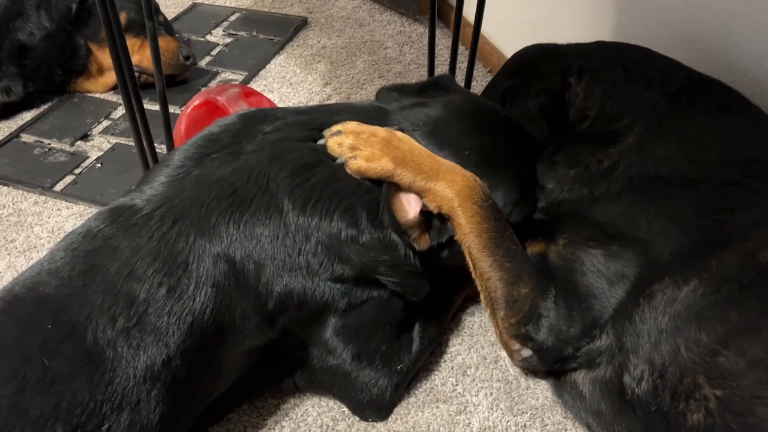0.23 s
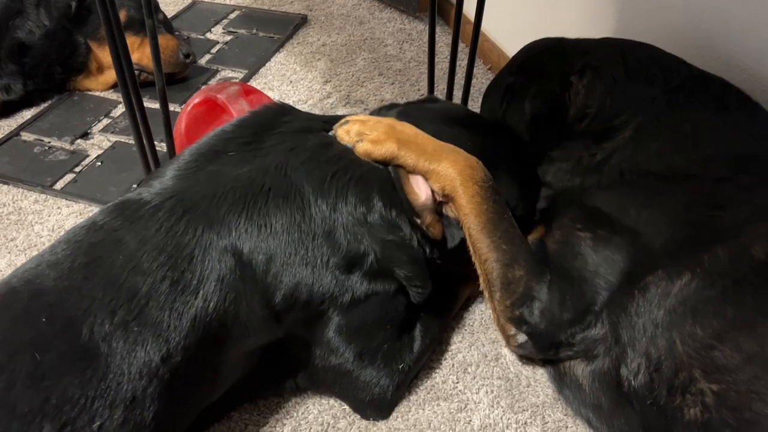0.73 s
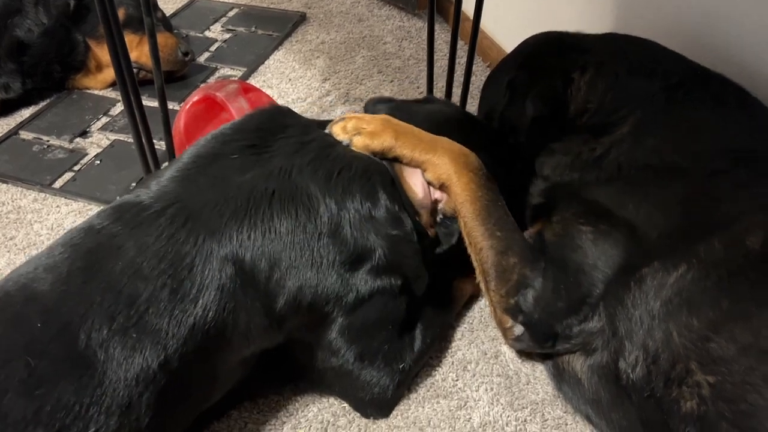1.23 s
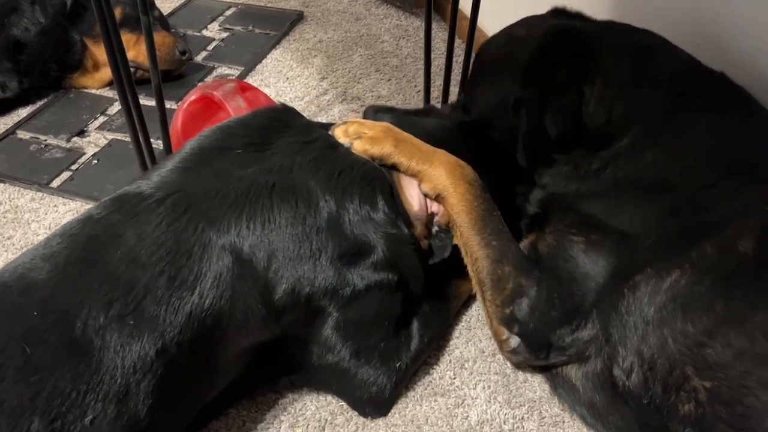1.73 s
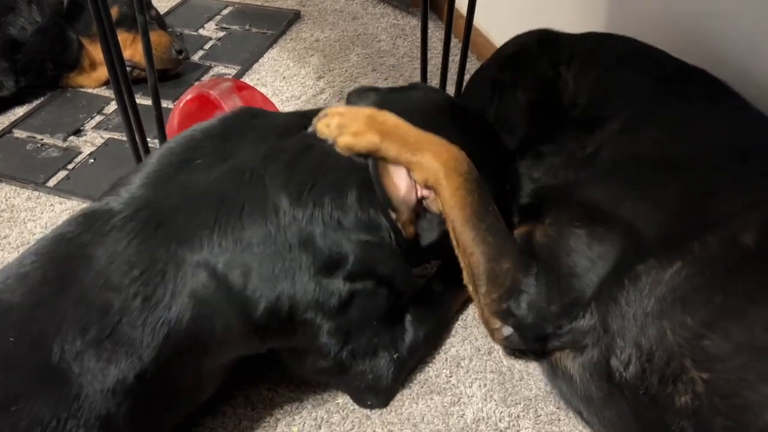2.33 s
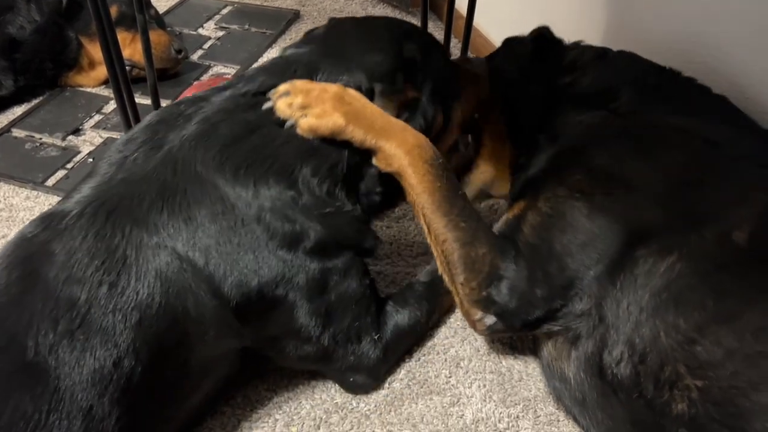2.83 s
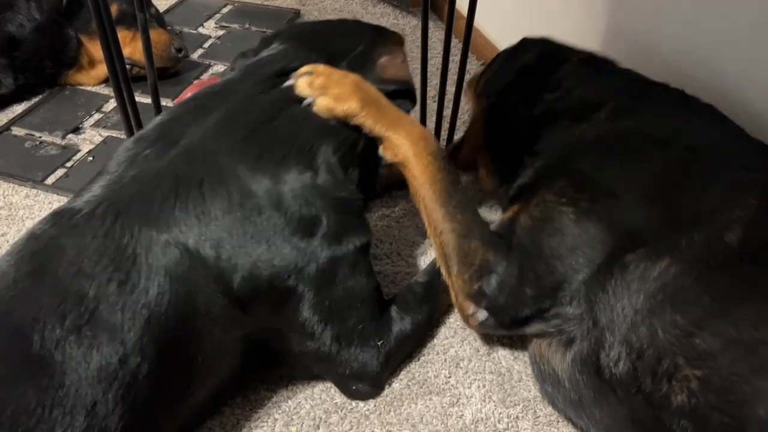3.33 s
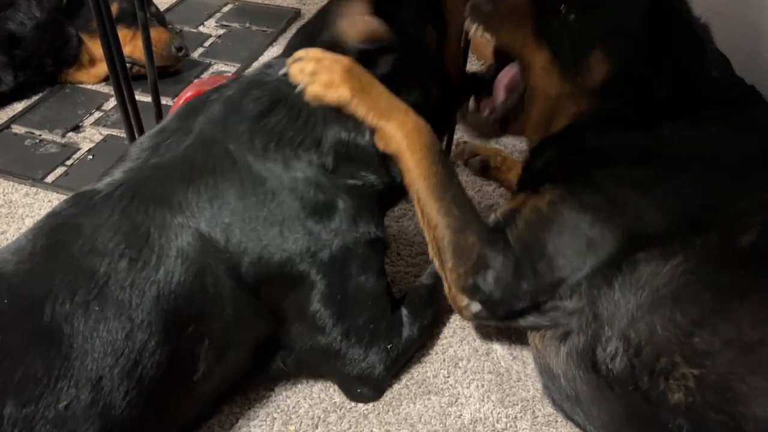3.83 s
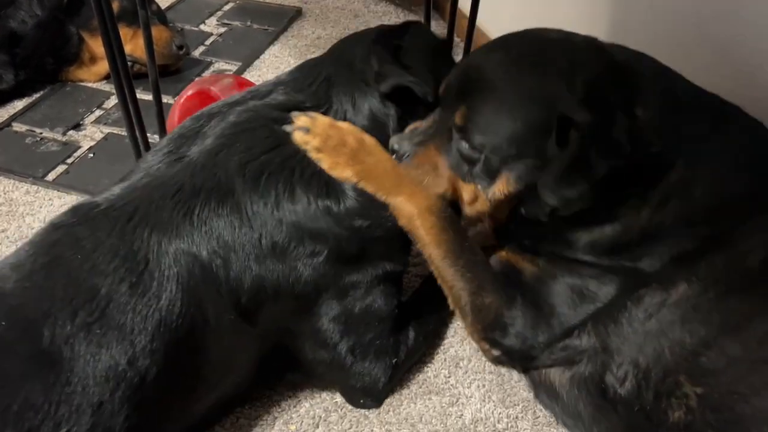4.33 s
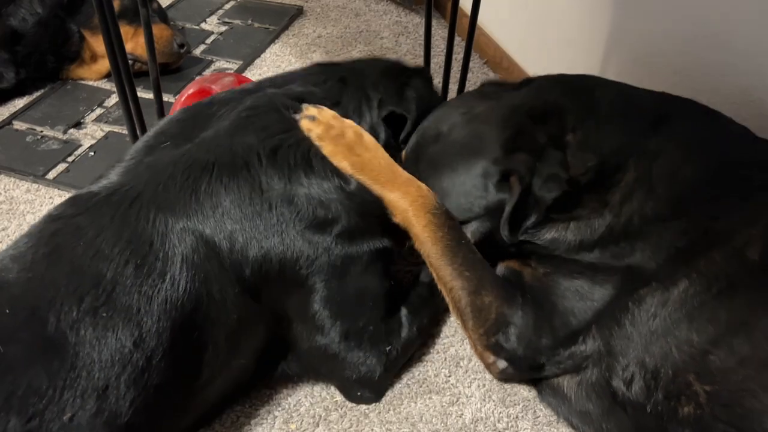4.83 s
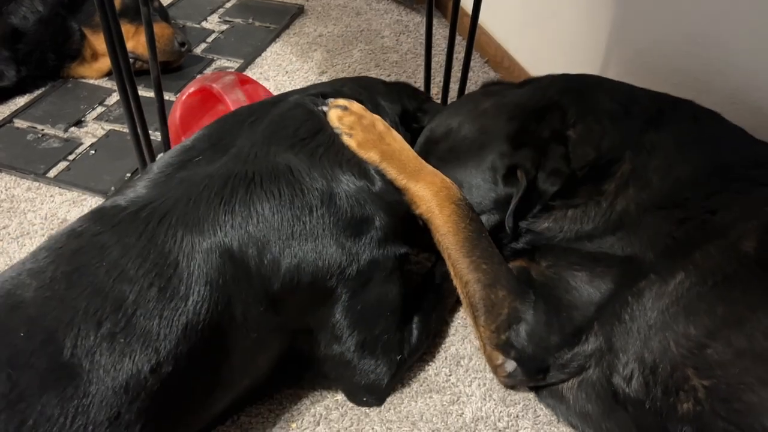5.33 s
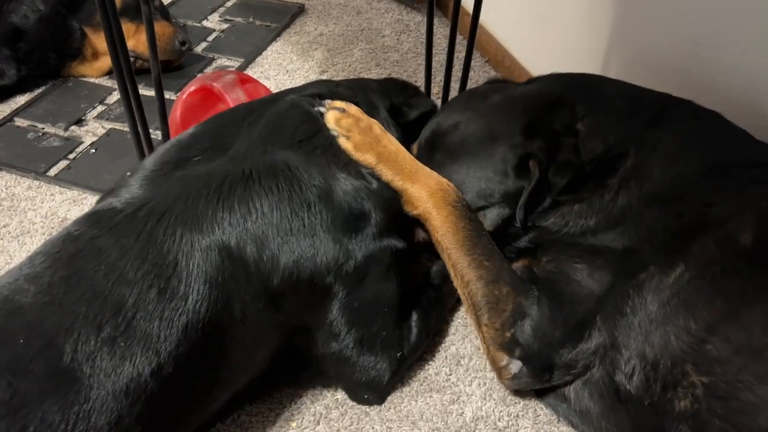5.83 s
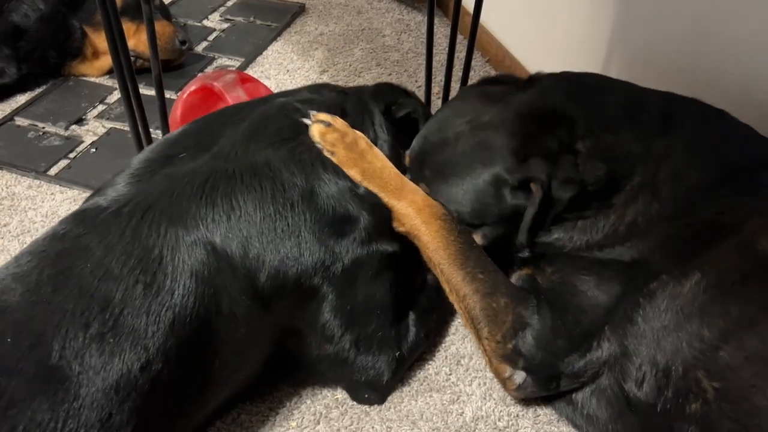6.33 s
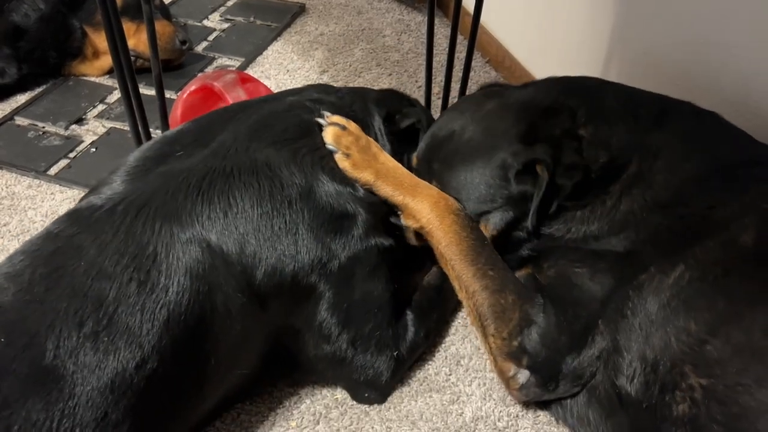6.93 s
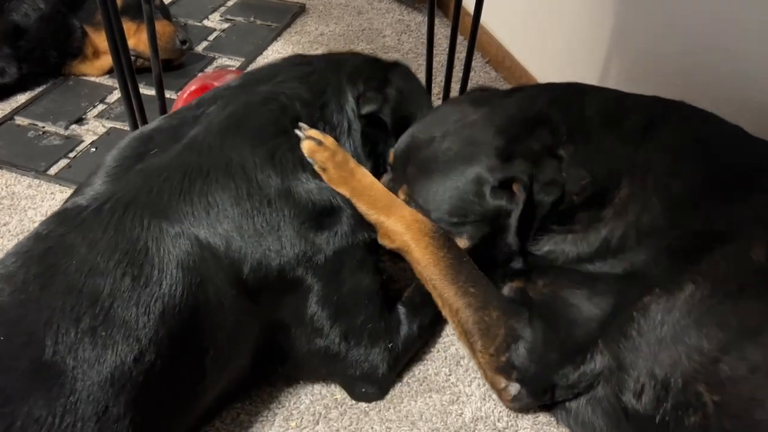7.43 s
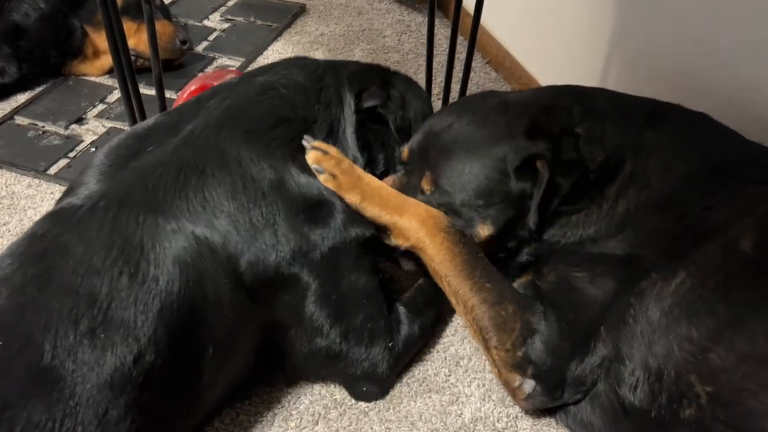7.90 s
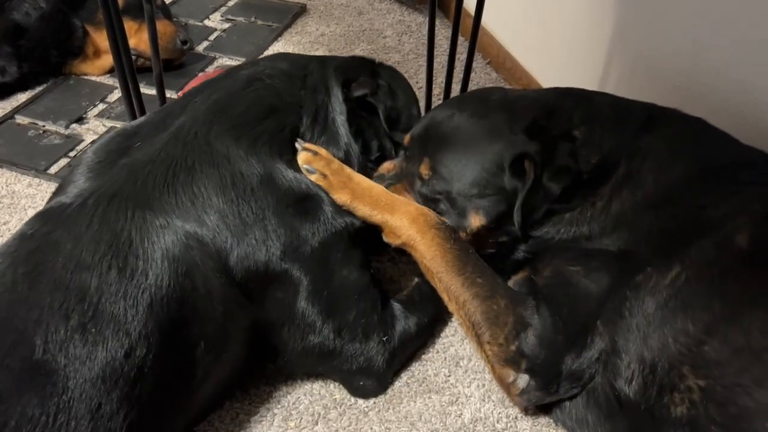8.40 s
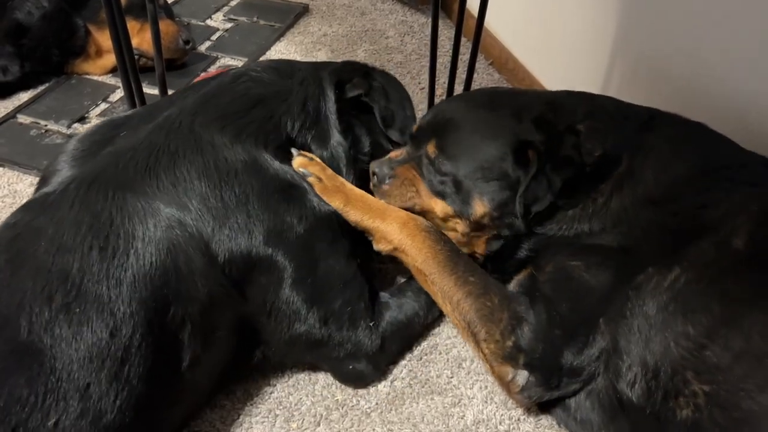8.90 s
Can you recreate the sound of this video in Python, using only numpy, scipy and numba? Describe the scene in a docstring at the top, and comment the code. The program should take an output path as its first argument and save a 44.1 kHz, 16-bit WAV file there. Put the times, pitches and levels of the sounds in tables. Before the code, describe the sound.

Two large dogs play-fight indoors, close to a phone. Deep fluttering growls start after about a second and repeat roughly once a second, shifting from open, gaping snarls to tighter, raspier ones. Breath hisses and snuffles between them, teeth click, something knocks dully, and a tiny whimper precedes the last growl. Short room echoes over faint low hum.

```python
"""A large dog growls in seven long, rough bursts, with short grunts between, as two wrestle close to a phone.
Slack vocal folds slap about 70 times a second and ring chest and throat; a moving mouth shapes the snarl.
Noise pulsed by the slaps makes the rushing air. Lips flap, teeth click, a dog whimpers and snuffles,
and something knocks softly. A small room answers with decaying noise echoes over its low, noisy hum."""
import sys
import numpy as np
from scipy import signal
from scipy.fft import rfft, irfft
from scipy.io import wavfile
from scipy.ndimage import uniform_filter1d
from numba import njit

SR = 44100
rng = np.random.default_rng(int(sys.argv[2]) if len(sys.argv) > 2 else 0)


def to_wav(sig):
    """Store sig (one row per channel, or 1-D mono) as 16-bit WAV at the path in sys.argv[1].

    Samples outside -1..1 are clipped; the rate is SR.
    """
    pcm = np.clip(np.atleast_2d(sig), -1, 1) * 32767
    pcm = np.round(pcm).astype(np.int16)
    wavfile.write(sys.argv[1], SR, pcm.T)  # frames by channels


N = 403956
TIME = np.arange(N) / SR

# Growls and the soft grunts between them; effort and swelling change these base levels:
# start_s, end_s, pulse_rate_hz, final_rate_sag_hz, first_roughness (0-1), last_roughness (0-1),
# chest_db, throat_db, snarl_db, air_db, snarl_fading_db_per_s
GROWLS = [(1.34, 1.79, 73.12, 7, 0.26, 0.47, -24.5, -38.5, -42, -62.5, 2.5),
          (2.135, 3.19, 72.45, 5.5, 0.63, 0.43, -21.5, -39.5, -40, -58.5, 2),
          (3.37, 3.41, 68.44, 0, 0.53, 0.91, -39, -54, -50.5, -57.5, 18),
          (3.575, 3.865, 70.9, 5, 0.49, 0.35, -21, -41, -33.5, -46.5, -15.5),
          (4.13, 4.21, 69.93, 0, 0.75, 0.57, -36.5, -50, -43.5, -56.5, 24),
          (4.265, 5.26, 68.3, 5, 0.88, 0.5, -23, -39, -34, -54.5, 12.5),
          (5.6, 5.7, 65.9, 0, 0.57, 0.75, -41, -51, -60.5, -69, -5),
          (5.735, 6.64, 70.78, 12, 0.78, 0.63, -22.5, -36, -38, -57, 4),
          (7.12, 8.04, 72.94, 23, 0.73, 0.084, -20.5, -33, -36.5, -59.5, 1),
          (8.58, 9.2, 69.18, 3.5, 0.72, 0.68, -23.5, -33.5, -38.5, -52, 0.5)]
# The voice breaks into a higher, cleaner register:
# start_s, end_s, first_hz, last_hz, chest_change_db, roughness (0-1)
BREAKS = [(2.675, 2.89, 113, 98.97, 0, .2), (4.33, 4.55, 130, 106, -2.5, .7)]
# Hard flaps of the lips: time_s, peak_db (before a common gain), mouth_resonance_hz
FLAPS = [(2.160, -28, 1507), (2.440, -29, 810), (2.668, -22, 756), (2.717, -23, 773), (2.867, -28.5, 770),
         (3.715, -18.5, 830), (3.729, -23, 877.7), (3.76, -21, 720), (3.807, -18, 786), (3.82, -16.5, 720),
         (4.272, -19.5, 770), (4.561, -14.5, 1060), (4.593, -17.5, 1153), (4.763, -31, 734),
         (4.991, -24, 740), (5.901, -28, 707.5), (6.02, -18.5, 1276), (6.036, -24, 1206),
         (6.091, -20, 1240), (6.107, -28, 1271), (6.256, -25.5, 1220), (6.443, -24, 707),
         (7.135, -27, 1280), (7.178, -24, 1210), (7.307, -22, 1190), (8.808, -31, 700), (8.9, -16, 1208),
         (8.915, -16.5, 1255), (8.957, -18, 1302), (8.973, -20.5, 1260), (9.071, -27, 1250),
         (9.115, -30, 1280)]
SAG_S = 0.3  # length of the tired end of a growl
ATTACK_DB_PER_S = 421.5


def undb(db):
    """Decibels to gain."""
    return 10 ** (np.asarray(db) / 20)


def unit(x):
    """Scale to rms 1."""
    return x / np.sqrt(np.mean(x ** 2))


def steady(x, seconds):
    """Even out the slow level, keeping the single pulses."""
    size = int(seconds * SR)
    power = uniform_filter1d(uniform_filter1d(x ** 2, size), size)
    return x / np.sqrt(power + 1e-5 * np.mean(x ** 2))


def colour(x, points):
    """Causal minimum-phase filter through (Hz, dB) points, made by folding the cepstrum."""
    size = 16384
    hz, db = np.transpose(points)
    f = np.maximum(np.fft.rfftfreq(size, 1 / SR), 1)
    cepstrum = irfft(np.log(undb(np.interp(np.log(f), np.log(hz), db))))
    cepstrum[1:size // 2] *= 2
    cepstrum[size // 2 + 1:] = 0
    response = irfft(np.exp(rfft(cepstrum)))[:size // 2]
    return signal.fftconvolve(x, response)[:N]


def cut(x, hz, kind, order=2):
    """Butterworth low- or high-pass."""
    return signal.sosfilt(signal.butter(order, hz, kind, fs=SR, output="sos"), x)


@njit
def resonate(x, hz, width):
    """Band-pass of a given width in Hz whose centre may move: a state-variable filter."""
    y, band, low = np.empty(len(x)), 0., 0.
    for i in range(len(x)):
        g, damping = np.tan(np.pi * hz[i] / SR), width / hz[i]
        v = (band + g * (x[i] + 1e-18 - low)) / (1 + g * (g + damping))
        band, low, y[i] = 2 * v - band, low + 2 * g * v, damping * v
    return y


def cavity(x, modes):
    """Fixed resonances side by side, with alternating sign."""
    out = np.zeros(N)
    for k, (hz, width, db) in enumerate(modes):
        out += (-1) ** k * undb(db) * resonate(x, np.full(N, float(hz)), float(width))
    return out


def impulses(times, sizes):
    """One spike at each time."""
    return np.bincount(np.clip(times * SR, 0, N).astype(int), sizes, N + 1)[:N]


def fade(x, seconds):
    """Give each spike an exponential tail."""
    return signal.lfilter([1], [1, -np.exp(-1 / (seconds * SR))], x)


def walk(rate):
    """A smooth random wander with rms 1, slower than the given rate in Hz."""
    return unit(cut(rng.standard_normal(N), rate, "low"))


def ramp(start, end):
    """0 before the start, 1 after the end, straight in between."""
    return np.clip((TIME - start) / max(end - start, .001), 0, 1)


def swells(rows):
    """Smooth bumps from (time_s, half_length_s, height) rows."""
    return sum(height * np.exp(-np.minimum(((TIME - s) / length) ** 2, 50)) for s, length, height in rows)


def growl(air_db=-2, throat_rasp=0.93, snarl_rasp=1.51, snarl_scatter_db=2.5, snarl_surge_db=3.0,
          air_surge_db=1.3, air_side=0.7, air_tick=0.066):
    """Fold slaps ring chest, throat and moving mouth; air rushes after them. Gives voice and side spray."""
    # chest body: frequency_hz, level_db
    chest_points = [(18, -69.5), (30, -37), (50, -2.5), (70, 10.5), (97, 0), (144, -2), (177, -8.5),
                    (283, -19.5), (300, -12.5), (390, -45), (660, -120)]
    steady_flow = .33  # air that escapes whatever the folds do
    full_voice_db = -27  # below this chest level the rattle dies with the voice
    chest_level, throat_level, snarl_level, air_level = levels()
    hz, rough = folds()
    times, sizes = fold_slaps(hz, rough)
    slaps = impulses(times, sizes)
    # in a rough voice some closures are much sharper than others, which shows in the upper resonances
    scatter = snarl_scatter_db * np.interp(times, TIME, rough) * rng.standard_normal(len(times))
    sharp = impulses(times, sizes * undb(scatter))
    flow = unit(unit(fade(sharp, 0.004)) + steady_flow)
    rasp, rush, spray = flow * rng.standard_normal((3, N))
    # smooth closures leak little turbulence into the voice
    rasp = rasp * np.sqrt(rough)
    chest = cut(cut(colour(slaps, chest_points), 233, "low", order=4), 40, "high")
    throat = throat_ring(unit(slaps) + throat_rasp * rasp)
    throat = cut(cut(throat, 205, "high", order=4), 750, "low", order=4)
    mouth = wall_echo(snarl(unit(sharp) + snarl_rasp * rasp))
    # the closures themselves also tick in the upper resonances
    rush = rush + air_tick * unit(cut(slaps, 4200, "low"))
    air = hiss(rush + 0.56 * rng.standard_normal(N))
    side = hiss(spray + 0.56 * rng.standard_normal(N))
    throat_level = throat_level + 1.97 * walk(13.8)
    snarl_level = snarl_level + seals() + snarl_surge_db * rough * walk(6.7)
    air_level = air_level + air_db + air_surge_db * walk(9.5)
    layers = [(chest, chest_level), (throat, throat_level), (mouth, snarl_level), (air, air_level)]
    voice = sum(steady(x, 0.09) * undb(db) for x, db in layers)
    voice += rattle(slaps, rasp) * undb(np.minimum(chest_level - full_voice_db, 0))
    return voice, air_side * steady(side, .06) * undb(air_level)


def levels():
    """Chest, throat, snarl and air in dB: attack, hold, sag and release, with pushes of effort on top."""
    # pushes of effort within a growl: time_s, half_length_s, snarl_change_db, air_change_db
    pushes = [(1.699, 0.034, -0.5, 4), (2.172, 0.023, 5.5, 10), (2.523, 0.063, 4, -5),
              (2.706, 0.22, 6.5, 8), (3.088, 0.012, 2.5, 10), (3.193, 0.12, 2.5, 11), (3.622, 0.016, 6, 8),
              (3.87, 0.0096, 5.5, 6.5), (4.27, 0.044, 6, 12.5), (4.518, 0.21, 5, 4.5),
              (5.017, 0.078, 0, -12), (4.805, 0.055, 5, 8), (5.773, 0.052, 2.5, 3.5),
              (6.104, 0.063, 5, 7.5), (7.185, 0.17, 1, 9), (7.958, 0.12, -3, 3), (8.93, 0.068, -1.5, 0)]
    # each layer starts this much weaker and swells: chest, throat, snarl, air [dB]
    swell_db = np.array([3.1, 8.7, 3.8, 6.7])[:, None]
    swell_s = 0.026
    # faint lingering around each growl, relative to it: chest, throat, snarl, air [dB]
    edge_db = np.array([-19.5, -22, -18, -11])[:, None]
    edge_db_per_s = 85
    # snarl and air stir later than the low rumble before a growl and rise faster
    lead = np.array([edge_db_per_s, edge_db_per_s, 188, 188])[:, None]  # dB per s
    release = np.array([318, 318, 392, 292])[:, None]  # dB per s
    sag_db_per_hz = 0.25  # as the air runs out the slowing folds weaken
    snarl_sag = 0.38  # share of this weakening that reaches the snarl
    air_fading = 0.93  # share of the snarl's fading that the air follows
    push_chest, push_throat = 0.18, 0.94  # dB for each dB of snarl
    out = np.full((4, N), -120.)
    for start, end, _, sag, _, _, chest, throat, mouth, air, fading in GROWLS:
        tired = sag_db_per_hz * sag * ramp(end - SAG_S, end)
        faded = fading * (end - start) * ramp(start, end)
        held = np.array([chest - tired, throat - tired,
                         mouth - snarl_sag * tired - faded, air - air_fading * faded])
        held = held - swell_db * np.exp(-np.maximum(TIME - start, 0) / swell_s)
        before, after = np.maximum(start - TIME, 0), np.maximum(TIME - end, 0)
        main = -ATTACK_DB_PER_S * before - release * after
        edge = edge_db - lead * before - edge_db_per_s * after
        out = np.maximum(out, held + np.maximum(main, edge))
    out[0] += sum(db * in_break(start, end) for start, end, _, _, db, _ in BREAKS)
    push = swells([(s, length, db) for s, length, db, _ in pushes])
    blow = swells([(s, length, db) for s, length, _, db in pushes])
    return out + np.array([push_chest * push, push_throat * push, push, blow])


def folds():
    """Pulse rate and roughness: each growl scoops up, settles, and sags at the end."""
    scoop_hz, scoop_s = 9, .13  # the folds start slow and gather speed
    waver, waver_hz = .058, 8  # relative spread of the rate at full roughness, and its speed
    hz, rough = np.full(N, float(GROWLS[0][2])), np.zeros(N)
    for start, end, rate, sag, first, last, *_ in GROWLS:
        now = TIME > start - 20 / ATTACK_DB_PER_S
        scoop = scoop_hz * np.exp(-np.maximum(TIME - start, 0) / scoop_s)
        hz = np.where(now, rate - scoop - sag * ramp(end - SAG_S, end), hz)
        rough = np.where(now, first + (last - first) * ramp(start, end - SAG_S), rough)
    for start, end, first, last, _, roughness in BREAKS:
        share = in_break(start, end)
        hz = hz + share * (first + (last - first) * ramp(start, end) - hz)
        rough = rough + share * (roughness - rough)
    rough = np.clip(rough, 0, 1)
    return hz * np.exp(waver * rough * walk(waver_hz)), rough


def in_break(start, end, glide_s=.07):
    """How far the voice is in its higher register, 0-1."""
    return ramp(start - glide_s, start) - ramp(end, end + glide_s)


def fold_slaps(hz, roughness, jitter=.2, shimmer_db=4, second_slap=0.92, second_at=.46,
               second_scatter=0.1822):
    """Times and sizes of the closures; rough folds stumble and slap again in mid-cycle."""
    cycles = np.cumsum(hz) / SR
    times = np.interp(np.arange(1, int(cycles[-1])), cycles, TIME)
    period = 1 / np.interp(times, TIME, hz)
    rough = np.interp(times, TIME, roughness)
    chance = rng.standard_normal((len(times), 5)).T
    # each stumble carries over into the next cycles
    stumble = signal.lfilter([1], [1, -.8], chance[0])
    first = times + jitter * rough * period * stumble
    second = first + period * (second_at + second_scatter * rough * chance[1])
    sizes = undb(shimmer_db * rough * chance[2:4])
    return np.r_[first, second], np.r_[sizes[0], second_slap * np.sqrt(rough) * sizes[1]]


def throat_ring(x, width_hz=30, ring_db=6.5, open_db=-9):
    """One narrow resonance that shifts with the larynx, and fixed ones that fade as the jaw opens."""
    # fixed throat resonances: frequency_hz, width_hz, level_db
    throat_modes = [(218.6, 53, 2), (316, 28, -31.5), (500.4, 136, -4.5)]
    *_, opening, _, throat_hz = mouth_shape()
    ring = undb(ring_db) * resonate(x, throat_hz, float(width_hz))
    return ring - undb(open_db * opening) * cavity(x, throat_modes)


def mouth_shape():
    """Tongue and lip resonances, jaw opening, jaw and throat resonances at every moment."""
    # mouth poses: time_s, tongue_hz, lip_hz, jaw_opening (0-1), jaw_hz, throat_hz
    poses = [(1.47, 1018, 1640, 0.36, 730, 387), (1.721, 1154, 1630, 0.72, 727, 394),
             (2.17, 1084, 1750, 0.6, 756, 383), (2.549, 1150, 1700, 0.99, 710, 370),
             (2.72, 1046, 1470, 1, 734, 358), (3.0, 1110, 1470, 0.9, 720, 380),
             (3.199, 1160, 1700, 0.84, 826, 369), (3.63, 1044, 1990, 0.44, 833, 367),
             (3.7, 1041, 1940, 0.7, 840, 380), (3.772, 1240, 1930, 0.5, 790, 380),
             (3.82, 1130, 1750, 1, 788.8, 406), (3.88, 1360, 1760, 0.2, 850, 420),
             (4.27, 1035, 1790, 0.43, 755, 372), (4.42, 1064, 1620, 0.43, 706, 339),
             (4.55, 1242, 1611, 0.35, 830, 334), (4.722, 1516, 1760, 0.3, 727, 371),
             (5.079, 1554, 1940, 0.41, 790, 361), (5.8, 1465, 2130, 0.12, 760, 373),
             (6.08, 1350, 1900, 0, 750, 354), (6.22, 1555, 2052, 0.02, 769.6, 357),
             (6.6, 1510, 2029, 0.04, 726, 348), (7.14, 1321, 2140, 0.42, 750, 352),
             (7.29, 1220, 2036, 0.23, 756.4, 342), (7.419, 1465, 2080, 0.1, 770, 377),
             (8.051, 1436, 2150, 0.33, 754, 337), (8.6, 1120, 2003, 0.45, 728.3, 360.8),
             (8.85, 1500, 2065, 0.22, 646, 354.6)]
    s, *columns = np.transpose(poses)
    return [np.interp(TIME, s, c) for c in columns]


def snarl(buzz, chewing=0.04, jaw_width_hz=85, jaw_db=5, jaw_leak=0.11, tongue_width_hz=150,
          narrowing=0.66, tongue_open_db=-6, muzzle_open_db=-5, lip_width_hz=300, lip_db=-21, lip_open_db=14):
    """An open jaw lets out its low resonance and sharpens the tongue's; a closed one favours the muzzle."""
    # fixed muzzle resonances: frequency_hz, width_hz, level_db
    muzzle_modes = [(714, 240, -12.5), (1256, 240, -9.5), (1652, 80, -11)]
    tongue_hz, lip_hz, opening, jaw_hz, _ = mouth_shape()
    chew = np.exp(chewing * walk(7.0))  # tongue and lips never rest
    tongue_hz, lip_hz = tongue_hz * chew, lip_hz * chew
    jaw = (opening ** 2 + jaw_leak) * undb(jaw_db) * resonate(buzz, jaw_hz, float(jaw_width_hz))
    broad = resonate(buzz, tongue_hz, float(tongue_width_hz))
    narrow = resonate(buzz, tongue_hz, float(tongue_width_hz * (1 - narrowing)))
    tongue = undb(tongue_open_db * opening) * (broad + opening * (narrow - broad))
    lips = resonate(resonate(buzz, lip_hz, float(lip_width_hz)), lip_hz, 260.0)
    muzzle = undb(muzzle_open_db * opening) * cavity(buzz, muzzle_modes)
    lower = cut(cut(jaw - tongue + muzzle, 470, "high", order=4), 1595, "low", order=8)
    return lower + undb(lip_db + lip_open_db * opening) * lips


def wall_echo(x, lag_ms=4, sway_ms=0.34, share=0.54):
    """A close reflection whose path changes as the head moves."""
    lag_s = (lag_ms + sway_ms * walk(2.11)) / 1000
    return x + share * np.interp(TIME - lag_s, TIME, x)


def seals(seal_s=0.0074, seal_db=-4):
    """Loss in dB while the lips close just before each flap and muffle the snarl."""
    return swells([(s - seal_s, seal_s, seal_db) for s, *_ in FLAPS])


def hiss(noise, drift=0.079):
    """Rushing air in the upper resonances of the muzzle, which drift as the lips move."""
    # colour of the air: frequency_hz, level_db
    air_points = [(2200, 6.5), (2900, -3), (4700, -4), (8400, -6), (9400, -12), (10300, -23), (15500, -16)]
    # upper muzzle resonances, before their drift: frequency_hz, width_hz, level_db
    hiss_modes = [(3890, 290, 6), (5800, 170, 7), (8270, 210, 7.5)]
    air = cut(colour(noise, air_points), 1600, "high", order=4)
    out = air.copy()
    for hz, width, db in hiss_modes:
        out += undb(db) * resonate(air, hz * np.exp(drift * walk(3.1)), float(width))
    return out


def rattle(slaps, rasp, drift=0.024, width_hz=260, rattle_rasp=.9):
    """While the throat is tight, each closure cracks in its upper resonances, one of which stands out."""
    # stretches of tight throat: time_s, half_length_s, level_db, strongest_resonance_hz (before its drift)
    tight_spells = [(2.539, 0.026, -47, 2560), (2.704, 0.12, -53, 3380), (4.301, 0.042, -47.5, 3220),
                    (4.645, 0.016, -52.5, 2830), (4.817, 0.075, -56.5, 2600), (5.167, 0.2, -61, 2600),
                    (5.823, 0.11, -55, 2460), (6.055, 0.18, -56.5, 2580), (6.462, 0.17, -54.5, 2620),
                    (7.185, 0.042, -51, 3381), (7.56, 0.28, -60.5, 2590), (7.957, .15, -58.5, 2760),
                    (8.806, 0.43, -57.5, 2516)]
    # upper resonances of a tight throat: frequency_hz, width_hz, level_db
    tight_modes = [(2550, 130, -6.5), (3430, 200, -13), (3920, 150, -10)]
    buzz = unit(slaps) + rattle_rasp * rasp
    times, *_, centres = np.transpose(tight_spells)
    nearest = np.searchsorted((times[1:] + times[:-1]) / 2, TIME)
    strongest_hz = uniform_filter1d(centres[nearest], SR // 20)
    strongest_hz = strongest_hz * np.exp(drift * walk(2.8))
    ring = cavity(buzz, tight_modes) + resonate(buzz, strongest_hz, float(width_hz))
    ring = cut(cut(ring, 2300, "high", order=4), 3740, "low", order=6)
    return steady(ring, 0.2) * swells([(s, length, undb(db)) for s, length, db, _ in tight_spells])


def flaps(width=0.42, grit=0.073, seconds=0.003, gain_db=2):
    """Hard flaps of the lips: a gritty push through a broad mouth resonance, each at its own pitch."""
    out, t = np.zeros(N), TIME[:SR // 25]
    for s, db, hz in FLAPS:
        push = signal.unit_impulse(len(t)) + grit * rng.standard_normal(len(t)) * np.exp(-t / seconds)
        centre, start = np.full(len(t), float(hz)), int(s * SR)
        ring = resonate(resonate(push, centre, width * hz), centre, width * hz)
        hit = cut(ring, 1900, "low", order=4)[:N - start]
        out[start:start + len(hit)] += hit * undb(db + gain_db) / np.abs(hit).max()
    return out


def puffs():
    """Bright hiss as air is forced between the teeth: swelling high-passed noise."""
    # puffs: time_s, half_length_s, level_db
    puff_rows = [(3.103, 0.027, -57), (3.202, 0.12, -61), (3.888, 0.094, -44), (4.062, 0.093, -57),
                 (6.104, 0.073, -62), (7.217, 0.065, -66)]
    swell = swells([(s, length, undb(db)) for s, length, db in puff_rows])
    return swell * unit(cut(rng.standard_normal(N), 9300, "high"))


def snuffles():
    """Soft rushes of air through a dog's nose: a thin hiss and a hollow, lower part."""
    # snuffles: time_s, half_length_s, thin_hiss_db, hollow_db
    sniffs = [(0.85, 0.18, -64.5, -95), (1.703, 0.14, -60, -75), (2.02, 0.17, -73, -55.5),
              (3.255, 0.18, -64, -57), (3.953, 0.22, -51.5, -52.5), (5.58, 0.089, -73.5, -55.5),
              (8.123, 0.16, -67, -75), (8.279, 0.026, -76, -53)]
    # Hz, dB
    thin_points = [(300, -11), (1100, 2.5), (2000, 3.5), (3000, 2.5), (6000, 5.0), (8500, -5.0),
                   (11000, -29.5)]
    hollow_points = [(150, -14), (450, 1.0), (1100, -0.5), (1900, -11), (2800, -25), (8000, -36.5)]
    thin = unit(colour(rng.standard_normal(N), thin_points))
    hollow = unit(colour(rng.standard_normal(N), hollow_points))
    thin_level = swells([(s, length, undb(db)) for s, length, db, _ in sniffs])
    hollow_level = swells([(s, length, undb(db)) for s, length, _, db in sniffs])
    return thin_level * thin + hollow_level * hollow


def whimpers(waver=0.05, rise_per_s=1.7):
    """A faint, unsteady moan of a few partials whose pitch rises in proportion to time."""
    # soft whimper after a growl: time_s, half_length_s, pitch_hz (at its middle), level_db (of the swell)
    moans = [(8.188, 0.04, 204, -43)]
    # partials from the fundamental up: level [dB]
    partials_db = [-2.5, 4.5, -5.5, -22]
    out = np.zeros(N)
    for s, length, hz, db in moans:
        rise = rise_per_s * np.clip(TIME - s, -2 * length, 2 * length)
        phase = 2 * np.pi * np.cumsum(hz * (1 + rise + waver * walk(42))) / SR
        tone = sum(undb(partial_db) * np.sin((k + 1) * phase) for k, partial_db in enumerate(partials_db))
        out += swells([(s, length, undb(db))]) * tone
    return out


def clicks():
    """Wet clicks of teeth and tongue: very short pushes through a bright body."""
    # clicks: time_s, peak_db (before a common gain)
    click_rows = [(2.8257, -27), (2.8375, -31), (3.074, -33), (3.086, -21), (3.095, -22), (3.514, -35),
                  (3.6, -35), (9.1014, -35)]
    body = [(1000, -44), (3500, -19), (6000, 18), (8500, 8), (15000, -18)]  # Hz, dB
    return blows(click_rows, body, seconds=0.00057, grit=0.11, gain_db=-10.5)


def knocks():
    """Soft knocks: short pushes through a dull body that is strongest near 100 Hz."""
    # knocks: time_s, peak_db (before a common gain)
    knock_rows = [(0.338, -31.5), (0.382, -29), (4.049, -29.5), (4.09, -27), (4.13, -28), (5.548, -30.5)]
    # knocked body: frequency_hz, level_db
    knock_body = [(59, -23), (100, 0), (366, -3), (647, -6.5), (755, -14), (923, -12), (1700, -25.5),
                  (3000, -60), (8800, -75)]
    return blows(knock_rows, knock_body, seconds=0.015, grit=0.051, gain_db=-3.5)


def blows(rows, body, seconds, grit, gain_db):
    """Short contacts: a spike and a gritty tail through a body, each at its own peak level."""
    out = np.zeros(N)
    ring = colour(signal.unit_impulse(N), body)[:SR // 20]
    tail = np.exp(-TIME[:len(ring)] / seconds)
    for s, db in rows:
        start = int(s * SR)
        push = signal.unit_impulse(len(ring)) + grit * rng.standard_normal(len(ring)) * tail
        hit = signal.fftconvolve(push, ring)[:N - start]
        out[start:start + len(hit)] += hit * undb(db + gain_db) / np.abs(hit).max()
    return out


def room(x, t60=0.29, wet_db=-5, left_db=2.0):
    """Walls return the middle and treble differently to each side; the bass echoes little."""
    t = TIME[:SR // 2]
    tails = rng.standard_normal((2, len(t))) * undb(-60 * t / t60) * (t > .003)
    tails /= np.sqrt(np.sum(tails ** 2, axis=1, keepdims=True))
    echoes = signal.fftconvolve(cut(x, 330, "high")[None], tails, axes=1)[:, :N]
    # a band around 780 Hz leans to the left
    lean = (undb(left_db) - 1) * resonate(x, np.full(N, 780.), 490.0)
    # the lows and mids reach the right side two samples later
    low = cut(x - lean, 1200, "low", order=1)
    right = x - lean - low + np.r_[0, 0, low[:-2]]
    return np.array([x + lean, right]) + undb(wet_db) * echoes


def hum(level_db=-57, side_db=-9):
    """The quiet low noise of the house, wide above its bass."""
    # colour of the hum: frequency_hz, level_db
    hum_points = [(15, -65.5), (25, -21.5), (65, -4.5), (168, -16), (231, -9), (278, -16.5), (363, -9.5),
                  (403, -20), (1780, -35.5), (2940, -51), (6500, -49), (14000, -85.5)]
    mid, side = (unit(colour(rng.standard_normal(N), hum_points)) for _ in range(2))
    side = undb(side_db) * cut(side, 250, "high")
    return undb(level_db) * np.array([mid + side, mid - side])


def scene():
    """The dogs and their small noises in the room, with the spray opposed left and right."""
    voice, spray = growl()
    dogs = voice + flaps() + puffs() + snuffles() + whimpers() + clicks()
    return room(dogs + knocks()) + np.array([spray, -spray]) + hum()


def record(dry):
    """The phone cuts the top with a steep elliptic low-pass."""
    top_hz = 15800
    return signal.sosfilt(signal.ellip(8, .2, 70, top_hz, fs=SR, output="sos"), dry)


dry = scene()
out = record(dry)
to_wav(out)
```